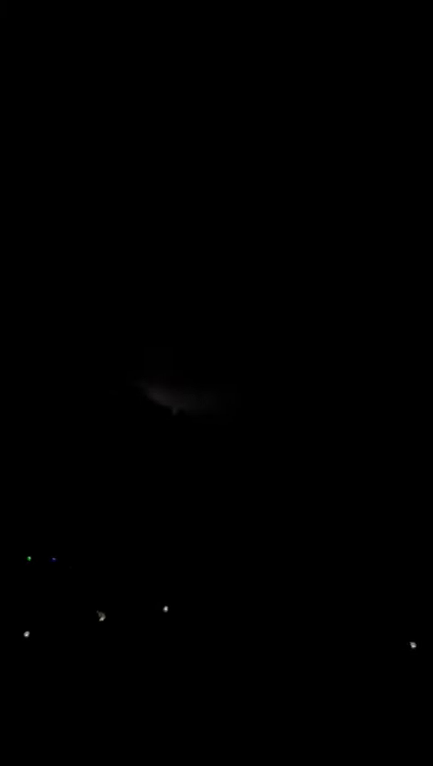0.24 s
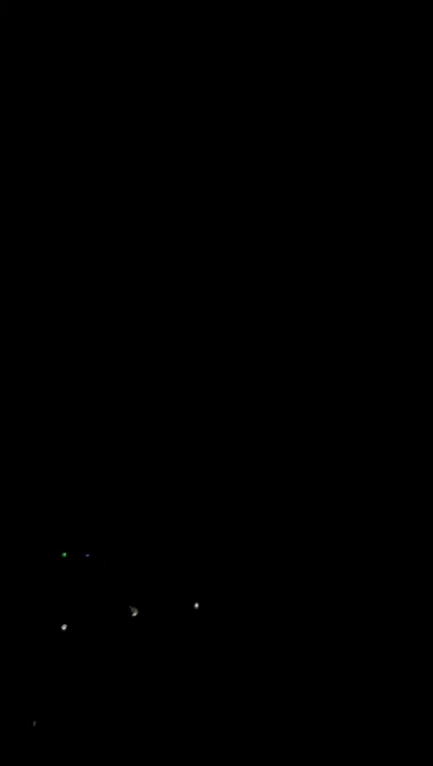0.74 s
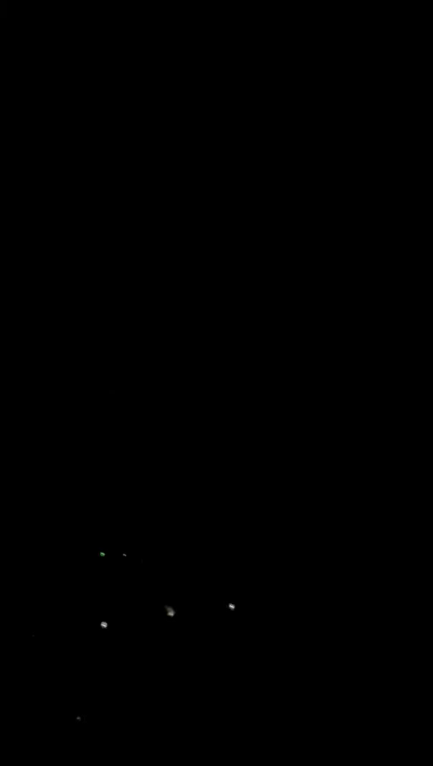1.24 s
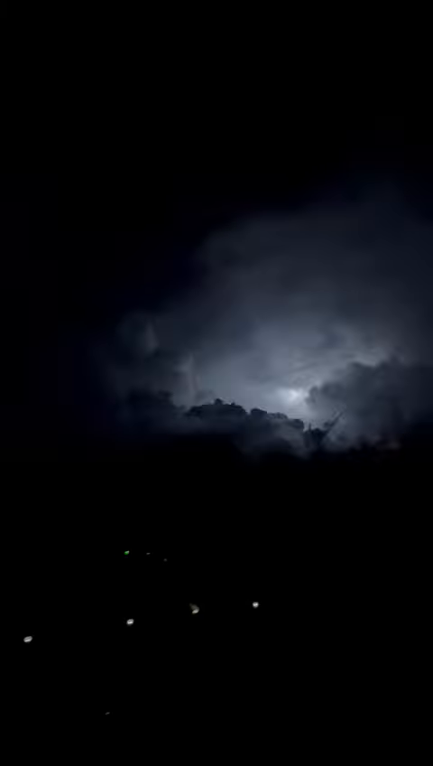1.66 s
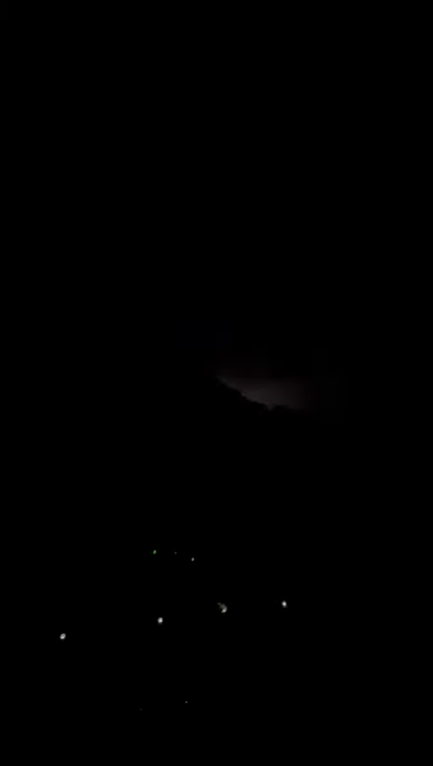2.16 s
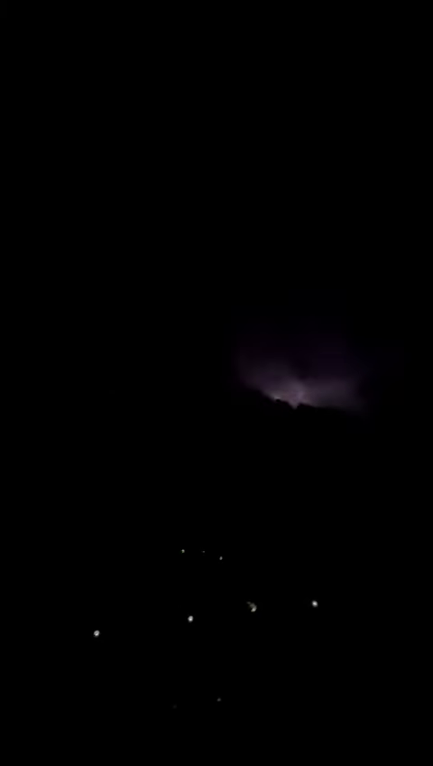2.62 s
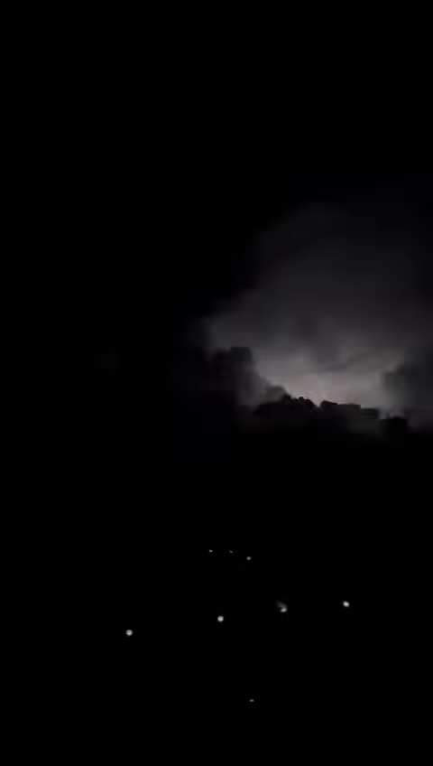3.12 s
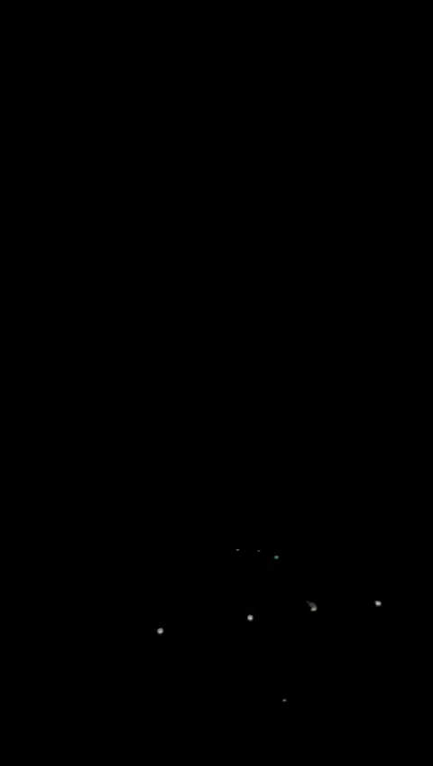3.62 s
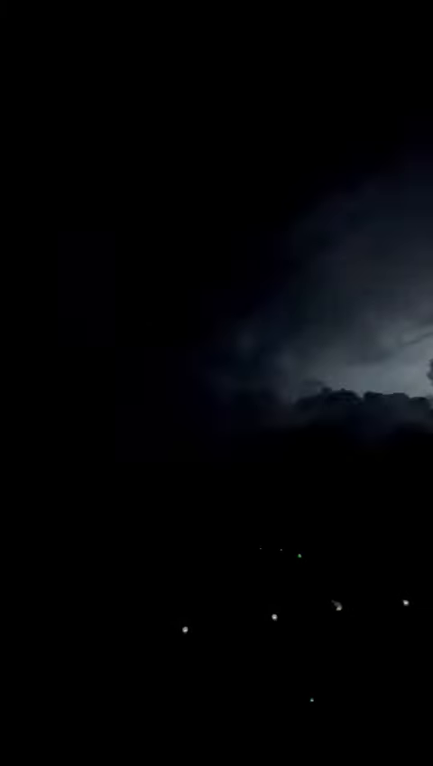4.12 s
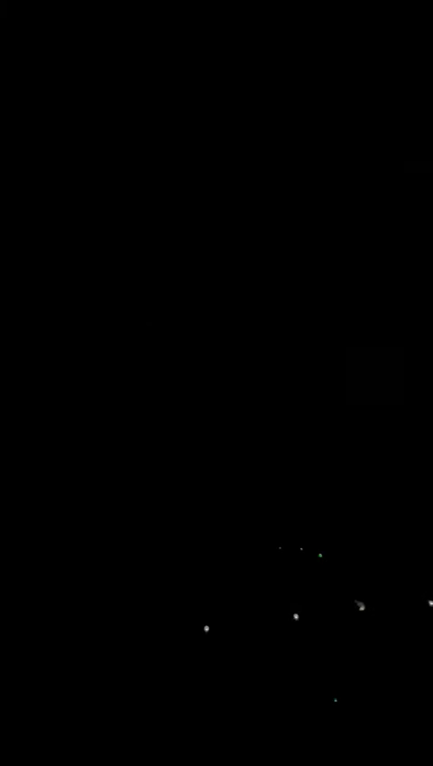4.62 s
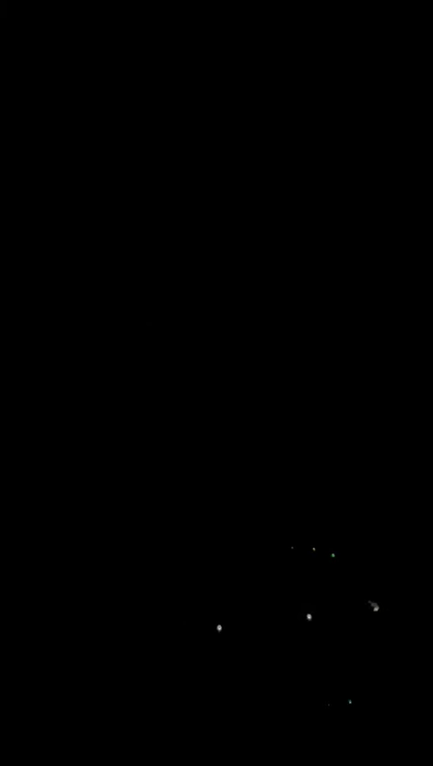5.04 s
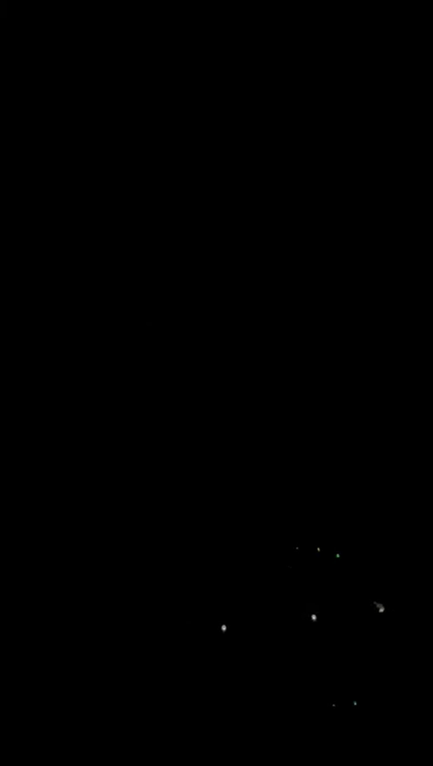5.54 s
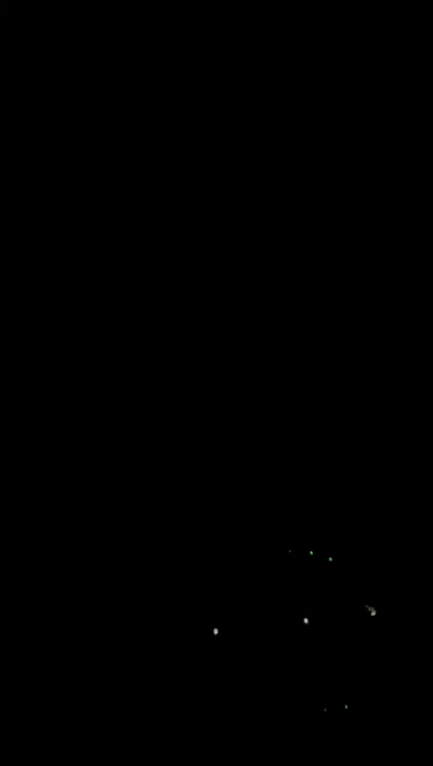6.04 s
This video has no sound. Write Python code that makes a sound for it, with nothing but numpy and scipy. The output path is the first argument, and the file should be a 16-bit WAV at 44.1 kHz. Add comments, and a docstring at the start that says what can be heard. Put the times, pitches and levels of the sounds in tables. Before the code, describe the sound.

Quiet open countryside at night, wide stereo. A near cricket repeats half-second trills around 5 kHz, each slowing and growing slightly louder, with short gaps. Other crickets give fast swelling buzzes that stop abruptly, three of them crisp and close. Behind are steady high insect choruses, thin squeaks probably from bats, and deep, muffled thunder rolling far away over a faint hum and soft airy wash.

```python
"""Summer night with distant thunder

Outdoors, a near cricket trills in slowing phrases, others swell in fast buzzes, and choruses hold four pitches:
all are trains of falling tones, one per wing stroke. Thin squeaks, probably bats, are short gliding sines.
Thunder, wash, soft midrange and hiss are shaped noise; a far machine hums in wavering sines, tyres sing as
narrow noise bands, and a dry leaf ticks once as a decaying noise burst."""
import sys
import numpy as np
from scipy import signal
from scipy.fft import rfft, irfft, next_fast_len
from scipy.io import wavfile
from scipy.ndimage import uniform_filter1d, map_coordinates

SR = 44100
rng = np.random.default_rng(int(sys.argv[2]) if len(sys.argv) > 2 else 0)


def to_wav(sig):
    """Store sig (one row per channel, or 1-D mono) as 16-bit WAV at the path in sys.argv[1].

    Samples outside -1..1 are clipped; the rate is SR.
    """
    pcm = np.clip(np.atleast_2d(sig), -1, 1) * 32767
    pcm = np.round(pcm).astype(np.int16)
    wavfile.write(sys.argv[1], SR, pcm.T)  # frames by channels


N = 276534
TIME = np.arange(N) / SR
STROKE_PITCH_SCATTER = 0.0065  # spread of pitch from stroke to stroke, as a share


def from_db(db):
    """Amplitude gain from decibels: 20 dB is a factor of ten."""
    return 10 ** (np.asarray(db) / 20)


def rms_one(x):
    """Normalisation to unit mean power."""
    return x / np.sqrt(np.mean(x ** 2) + 1e-20)


def in_time(rows):
    """Linear interpolation of each column of a curve at every sample."""
    s, *columns = np.transpose(rows)
    return [np.interp(TIME, s, column) for column in columns]


def coloured(x, points):
    """Spectral filtering: a gain curve drawn on a log-frequency axis multiplies the spectrum."""
    hz, db = np.transpose(points)
    size = next_fast_len(N)
    bins = np.maximum(np.arange(size // 2 + 1) * SR / size, 1)
    gain = from_db(np.interp(np.log(bins), np.log(hz), db))
    return irfft(rfft(x, size) * gain, size)[..., :N]


def drift(rate):
    """Band-limited random modulation: a smooth curve through `rate` random knots a second; rms 1."""
    knots = rng.standard_normal(512)
    curve = map_coordinates(knots, [TIME[::64] * rate], order=2, mode="wrap")
    return rms_one(curve)[np.arange(N) // 64]


def widen(mid, side, side_db):
    """Mid-side stereo: a shared and an opposed part are combined at constant power."""
    gain = from_db(side_db)
    return (mid + gain * side * [[1], [-1]]) / np.sqrt(1 + gain ** 2)


def noise(points, side_db):
    """Filtered white noise, partly decorrelated between the channels; rms 1."""
    return rms_one(coloured(widen(*rng.standard_normal((2, N)), side_db), points))


def modulated_noise(points, side_db, modulation_db, count=9):
    """Independent modulation: noise bands, each with its own random level modulation; rms 1."""
    edges = np.geomspace(500, 3200, count + 1)
    total = 0
    for band in zip(edges, edges[1:]):
        bandpass = signal.butter(2, band, "band", fs=SR, output="sos")
        gain = from_db(modulation_db * drift(11))
        total = total + gain * signal.sosfilt(bandpass, noise(points, side_db))
    return rms_one(total)


def lagged(stereo, lag_ms):
    """Channel delay: the left channel is shifted a little later, which widens the stereo image."""
    left = map_coordinates(stereo[0], [(TIME - lag_ms / 1000) * SR], order=3)
    return np.array([left, stereo[1]])


def outdoors(x, direct_db, side_db, lag_ms, t60=0.22):
    """Diffuse scattering by trees and ground: direct sound and a dense tail that falls 60 dB in t60 seconds."""
    age = TIME[:SR // 2]
    scatter = widen(*rng.standard_normal((2, len(age))), side_db)
    tail = scatter * from_db(-60 * age / t60) * (age > .003)
    response = tail / np.sqrt(np.sum(tail ** 2) / 2)
    response[:, 0] = from_db(direct_db)  # direct sound relative to the tail
    heard = signal.fftconvolve(x[None], response, axes=1)[:, :N]
    return lagged(heard / np.sqrt(1 + from_db(2 * direct_db)), lag_ms)


def strokes(rows, length, fall, skew, overtone_db=-60, fall_per_db=0, bend=1):
    """Stridulation: the scraper slows along the file, so each tone falls in pitch as it fades.

    Rows hold start_s, pitch_hz, level_db; `length` is in seconds and `fall` is a share of the pitch."""
    start, hz, db = np.transpose(sorted(rows))
    which = np.maximum(np.searchsorted(start, TIME, "right") - 1, 0)
    along = np.clip((TIME - start[which]) / length, 0, 1)
    # with fall_per_db above zero, soft strokes fall less; with bend above 1, the fall steepens to the end
    falls = fall * np.clip(1 + fall_per_db * (db - np.percentile(db, 75)), 0, 1)
    pitch = hz[which] * (1 - falls[which] * along ** bend)
    phase = 2 * np.pi * np.cumsum(pitch) / SR
    swell = np.sin(np.pi * along ** skew) ** 2 * 1.227 * from_db(db)[which]
    return np.sqrt(2) * swell * (np.sin(phase) + from_db(overtone_db) * np.sin(2 * phase))


def chorus(pitch_hz, fall, per_s, side_db, lag_ms, spread=0.021, flicker_db=1.13, count=4):
    """Superposition of detuned sources: far crickets flicker, each at its own pitch and pace; rms 1."""
    song = 0
    for offset in np.linspace(-1, 1, count):
        pace = per_s * (1 + .04 * rng.standard_normal())
        times = (np.arange(1200) - rng.random() + .04 * rng.standard_normal(1200)) / pace
        middle_hz = np.interp(times, TIME, np.broadcast_to(pitch_hz, N))
        pitches = middle_hz * (1 + fall / 2 + spread * offset)
        levels = 5.3 * np.minimum(rng.standard_normal(len(times)), 2) - 6 * abs(offset - .3)
        singer = strokes(zip(times, pitches, levels), 0.65 / pace, fall, skew=1.0)
        song = song + from_db(flicker_db * drift(17)) * singer
    return rms_one(outdoors(song, direct_db=-0.5, side_db=side_db, lag_ms=lag_ms))


def far_crickets():
    """Superposition of choruses: three are steady and a high one drifts in pitch, its level on a drawn curve."""
    # steady choruses: pitch_hz, fall_share_of_pitch, strokes_per_s, level_db, width_db, left_lag_ms
    steady_choruses = [(2661, .07, 49, -72, -2, 0.16), (3710, .075, 64, -88.5, -4.5, 0.047),
                       (7618, 0.18, 89, -91, -16.5, 0.0044)]
    # high chorus: time_s, pitch_hz, level_db
    high_chorus = [(0, 6480, -84.5), (1.3, 6500, -76), (2, 6500, -90.5), (2.3, 6530, -85), (2.8, 6508, -78),
                   (4.2, 6620, -72), (5, 6500, -73.5), (5.7, 6390, -84), (5.96, 6330, -74.5),
                   (6.27, 6400, -71.5)]
    steady = sum(from_db(db) * chorus(hz, fall, per_s, side_db, lag_ms)
                 for hz, fall, per_s, db, side_db, lag_ms in steady_choruses)
    pitch_hz, level_db = in_time(high_chorus)
    high = chorus(pitch_hz, fall=.08, per_s=89, side_db=0.0, lag_ms=.23, spread=0.031)
    return steady + from_db(level_db) * high


def thunder(steadiness=0.12):
    """Addition of incoherent powers: rolls and brief low-frequency surges over a rumble, nearly mono."""
    # swells: peak_s, level_db, rise_s
    swells = [(.5, -50, 0.051), (1.38, -39, 0.5), (2.103, -43, 0.6), (2.936, -40.5, 0.017),
              (3.668, -45, 0.018), (4.28, -50, 0.078)]
    # rumble between the swells: time_s, level_db
    rumble = [(0, -49), (3.6, -53.5), (5.9, -52), (6.27, -58.5)]
    # spectrum: frequency_hz, relative_density_db
    thunder_colour = [(20, -18.5), (35, -15), (52, 2.5), (72, 1), (90, -3), (120, -7), (155, -18.5),
                      (220, -25.5), (320, -45), (600, -99)]
    decay_ratio = 1  # time constant of the dying away, in rises
    power = from_db(in_time(rumble)[0]) ** 2
    for peak_s, db, rise_s in swells:
        age = (TIME - peak_s) / rise_s
        envelope = np.exp(-np.where(age < 0, age ** 2, age / decay_ratio))
        power = power + (from_db(db) * envelope) ** 2
    low_noise = noise(thunder_colour, side_db=-30)
    # the noise's own fluctuations are partly evened out
    loudness = uniform_filter1d(np.mean(low_noise ** 2, axis=0), SR // 10)
    return np.sqrt(power) * rms_one(low_noise / loudness ** (steadiness / 2))


def night_air(wash_db=5.5, midrange_db=0.0, hiss_db=-86):
    """Broadband noise: a wide wash of wind and traffic, a soft midrange noise and the hiss of countless insects."""
    # wash: time_s, relative_level_db (wash_db is added)
    wash_curve = [(0.1, -68.5), (1.32, -66), (3.92, -68), (4.14, -71.5), (5.31, -72.5), (5.67, -71.5),
                  (6.2, -75)]
    # midrange noise: time_s, level_db (before its random modulation)
    midrange_curve = [(.25, -79), (.7, -74.5), (1.1, -73.5), (1.8, -75.5), (2.3, -80.5), (2.9, -78),
                      (3.5, -81), (4, -76.5), (4.8, -82.5), (5.4, -83.5), (5.55, -80), (5.9, -84.5),
                      (6.2, -85.5)]
    # spectra: frequency_hz, relative_density_db
    wash_colour = [(100, -19.5), (160, 8.5), (230, 5.5), (380, -1), (540, 4.5), (700, -1.5), (900, -5.5),
                   (1300, -20), (2500, -63)]
    midrange_colour = [(500, -14), (900, 9.5), (1500, 2.5), (2200, -4), (2700, 4.5), (3100, -74.5),
                       (6000, -35.5)]
    hiss_colour = [(3200, -30.5), (4100, 29), (5000, 46.5), (5800, 9), (7000, -16), (8000, -11.5),
                   (8700, -22), (10000, -11.5), (11400, 10), (12200, -18)]
    wash_gain = from_db(in_time(wash_curve)[0] + wash_db)
    wash = wash_gain * lagged(noise(wash_colour, side_db=-9.0), lag_ms=0.39)
    modulation_db = 1.3 * drift(16)
    midrange_gain = from_db(in_time(midrange_curve)[0] + midrange_db + modulation_db)
    midrange = midrange_gain * modulated_noise(midrange_colour, side_db=-8, modulation_db=2.5)
    return wash + midrange + from_db(hiss_db) * noise(hiss_colour, side_db=-1.5)


def machine(waver_db=1.0, wander=0.62):
    """Propagation through moving air: steady tones waver in level and phase (radians) on their way."""
    # hum: frequency_hz, rms_level_db (about which it wavers)
    hum = [(75.0, -58.5), (296.6, -73.5), (593, -85), (889, -89)]
    total = 0
    for hz, db in hum:
        gain = from_db(db + waver_db * drift(6.7))
        total = total + np.sqrt(2) * gain * np.sin(2 * np.pi * hz * TIME + wander * drift(3.834))
    return total


def near_cricket(pitch_hz=5400, length=.0105, crescendo_db=2.0, uneven_db=1.0):
    """Stridulation in phrases that slow and grow louder; a light catch of the wing leads every stroke."""
    # phrases: first_stroke_s, last_stroke_s, stroke_count, slowing_share, level_db (at the end, unfiltered);
    # the pace swings from about this share above its mean to this share below
    phrases = [(0.013, 0.46, 13, 0.12, -61), (0.638, 1.343, 20, 0.11, -61.5),
               (1.546, 2.08, 15, 0.14, -60.5), (2.226, 2.673, 13, 0.18, -60), (2.853, 3.259, 12, .16, -62),
               (3.398, 3.911, 14, 0.17, -58), (4.079, 4.573, 14, .135, -57), (4.809, 5.257, 13, 0.13, -57),
               (5.438, 5.93, 14, .14, -59), (6.117, 6.543, 13, .14, -57)]
    catch_s, catch_rise_hz, catch_db = .007, 112.8, -6  # earlier, higher and softer than its stroke
    slap_s, slap_db = .017, -8  # one reflection from a hard surface
    rows = []
    for first, last, count, slowing, db in phrases:
        progress = np.linspace(0, 1, round(count))
        elapsed = progress - slowing / np.pi * np.sin(np.pi * progress)
        times = first + (last - first) * elapsed - length / 2
        soft_start_db = -3 * np.exp(-progress / 0.084)
        unevenness = uneven_db * rng.standard_normal(len(times))
        levels = db + crescendo_db * (progress - 1) + soft_start_db + unevenness
        scatter = STROKE_PITCH_SCATTER * rng.standard_normal(len(times))
        rows += zip(times, pitch_hz * (0.99 + .025 * progress + scatter), levels)
    catches = [(s - catch_s, hz + catch_rise_hz, db + catch_db) for s, hz, db in rows]
    song = strokes(rows, length, fall=.175, skew=1, overtone_db=-42)
    song = song + strokes(catches, length, fall=.08, skew=1)
    song = coloured(song, [(4200, 8.5), (4600, -2), (5000, 1.5), (5330, 5.5), (5700, -13.5)])
    song = song + from_db(slap_db) * np.interp(TIME - slap_s, TIME, song, left=0)
    return outdoors(song, direct_db=1.5, side_db=0, lag_ms=.27, t60=.45)


def tyres(width_hz=55):
    """Narrow-band noise: random quadrature modulation makes each far car's breathy tone, which swells and fades."""
    # cars: loudest_s, swell_s, pitch_hz, relative_level_db (3 dB above the level heard)
    cars = [(.05, 0.25, 572.5, -60.5), (0.649, 0.46, 557, -68.5), (1.65, 0.25, 605, -63),
            (2.81, 0.078, 701, -61), (3.5, 0.096, 518, -61), (4.95, 0.082, 608.5, -61.5),
            (5.319, 0.067, 679, -69.5), (5.61, 0.15, 697, -64.5)]
    tone = 0
    for s, swell_s, hz, db in cars:
        tone = tone + from_db(db) * np.exp(-((TIME - s) / swell_s) ** 2 + 2j * np.pi * hz * TIME)
    mid, side = [drift(2 * width_hz) * tone.real + drift(2 * width_hz) * tone.imag for _ in range(2)]
    return lagged(widen(mid, side, -1.7), lag_ms=0.51) / np.sqrt(2)


def bats(faint_db=-88.0, faint_spread_db=12, count=150, quaver_hz=290):
    """Frequency modulation: short hoarse glides and V-shaped bends over a shimmer of fainter, flatter squeaks."""
    # loudest squeaks: start_s, length_s, level_db, middle_pitch_hz, glide_start_to_end_hz, middle_sag_hz
    loud = [(0.448, 0.068, -75, 10800, -200, 698), (0.722, 0.062, -73.5, 9250, 0, 2900),
            (0.99, .045, -86, 10230, 1798, 2), (1.277, 0.07, -79, 10500, 0, 1400),
            (1.965, .041, -72.5, 11040, -500, 404), (2.385, 0.033, -71, 11620, 2, 203),
            (2.502, 0.048, -59.5, 11150, 300, 1100), (2.717, 0.028, -82.5, 9850, 2, 0),
            (2.785, .045, -86, 10480, 1000, 0), (2.981, 0.054, -82.5, 11640, 1001, 2),
            (3.198, 0.049, -78.5, 9800, -1100, 598), (4.02, 0.071, -79.5, 10670, -400, 694),
            (4.273, 0.024, -72, 10800, -3200, 0), (4.302, 0.068, -81, 11260, -2, 3),
            (4.975, 0.073, -74, 11450, 1403, 0), (5.152, 0.018, -81, 10880, -2800, 0),
            (5.187, 0.081, -83, 11100, 1202, 0), (5.59, 0.08, -65, 10880, 1907, 400),
            (5.75, 0.03, -69.5, 11400, -300, -1600)]
    faint = []
    for when, weak, low, slope in rng.random((count, 4)):
        faint.append((when * TIME[-1], 0.035 + 0.068 * weak, faint_db - faint_spread_db * weak,
                      11450 - 1700 * low ** 3, 1000 * (slope - .5), 0))
    out = np.zeros(N + SR)
    quaver = quaver_hz * np.resize(drift(520), N + SR)  # random pitch jitter, heard as hoarseness
    for s, length, db, middle_hz, glide_hz, sag_hz in loud + faint:
        along = np.linspace(0, 1, int(length * SR))
        span = max(int(s * SR), 0) + np.arange(len(along))
        pitch = middle_hz + glide_hz * (along - .5) + sag_hz * abs(2 * along - 1) + quaver[span]
        tone = np.sin(2 * np.pi * np.cumsum(pitch) / SR)
        out[span] += np.sqrt(2) * from_db(db) * np.sin(np.pi * along) * tone
    return outdoors(out[:N], direct_db=7, side_db=-12, lag_ms=.018, t60=.2)


def buzzes(table, pitch_hz, rise_hz, swell_db, ease_db, uneven_db):
    """Effort raises pitch and level together: fast strokes climb, hold, ease a little and stop short."""
    strokes_per_s = 59.1
    hz_per_db, middling_db = 23, -56.5  # a harder buzz is a higher one
    rows = []
    for start, full, end, db in table:
        times = np.arange(start, end, 1 / strokes_per_s)
        to_go = np.interp(times, [start, full], [1, 0])
        past = np.interp(times, [full, end], [0, 1]) ** 3
        unevenness = uneven_db * rng.standard_normal(len(times))
        levels = db - swell_db * to_go - ease_db * past + unevenness
        pitches = pitch_hz + hz_per_db * (db - middling_db) - rise_hz * np.sqrt(to_go)
        scatter = STROKE_PITCH_SCATTER * rng.standard_normal(len(times))
        rows += zip(times, pitches * (1 + scatter), levels)
    return rows


def buzzing_crickets(overtone_db=-24):
    """Wing resonance and scattering: the near buzzer is crisp with an octave overtone, the far ones echo more."""
    # near and far buzzes: start_s, full_strength_s, end_s, level_db (at full strength, unfiltered)
    near_buzzes = [(1.828, 1.945, 2.075, -48.3), (3.2105, 3.335, 3.44, -48.5), (5.548, 5.635, 5.74, -47.8)]
    far_buzzes = [(.62, .71, 0.86, -58), (1.22, 1.34, 1.47, -66), (1.68, 1.83, 2.05, -56.5),
                  (2.84, 2.95, 3.1, -55), (3.5, 3.63, 3.75, -67), (4.13, 4.27, 4.41, -57.5),
                  (4.92, 5.08, 5.2, -65.5), (5.36, 5.45, 5.82, -55)]
    # response of the near buzzer's wing: frequency_hz, gain_db
    wing = [(3700, -2.5), (4200, -1.5), (4450, -10), (4750, -4), (5000, -2), (5400, 2.5), (5680, 5),
            (6200, -26), (8500, -22), (9400, 1.5), (11000, -7.5), (12000, -12)]
    near_rows = buzzes(near_buzzes, pitch_hz=5618, rise_hz=480, swell_db=14.5, ease_db=1.5, uneven_db=1.5)
    far_rows = buzzes(far_buzzes, pitch_hz=5330, rise_hz=100, swell_db=11, ease_db=2, uneven_db=1)
    near = strokes(near_rows, length=.0155, fall=.36, skew=1.1, overtone_db=overtone_db,
                   fall_per_db=.022, bend=1.6)
    far = strokes(far_rows, length=.012, fall=.23, skew=.7, fall_per_db=.015)
    far = coloured(far, [(3900, 1), (4220, 2), (4450, -10), (4840, -5), (5010, 5), (5220, -3), (5600, -11)])
    near = outdoors(coloured(near, wing), direct_db=4, side_db=-1, lag_ms=.27, t60=.27)
    return near + outdoors(far, direct_db=-2, side_db=-4, lag_ms=.262, t60=.4)


def leaf(start_s=5.822, level_db=-66):
    """Impulsive excitation: a dry leaf ticks once, as noise that starts at once and decays exponentially."""
    age = np.maximum(TIME - start_s, 0)
    crack = noise([(400, -8), (1000, 1), (1900, -6), (3000, -22), (6000, -45)], side_db=0)
    return from_db(level_db) * (age > 0) * np.exp(-age / .012) * crack


def scene():
    """Linear superposition of insects and squeaks with the low sounds of the distance."""
    distance = thunder() + night_air() + machine() + tyres()
    animals = far_crickets() + near_cricket() + bats() + buzzing_crickets()
    return distance + animals + leaf()


def record(dry):
    """Elliptic low-pass filtering: the treble is cut steeply above 12400 Hz."""
    lowpass = signal.ellip(10, .2, 80, 12400, fs=SR, output="sos")
    return signal.sosfilt(lowpass, dry)


dry = scene()
out = record(dry)
to_wav(out)
```